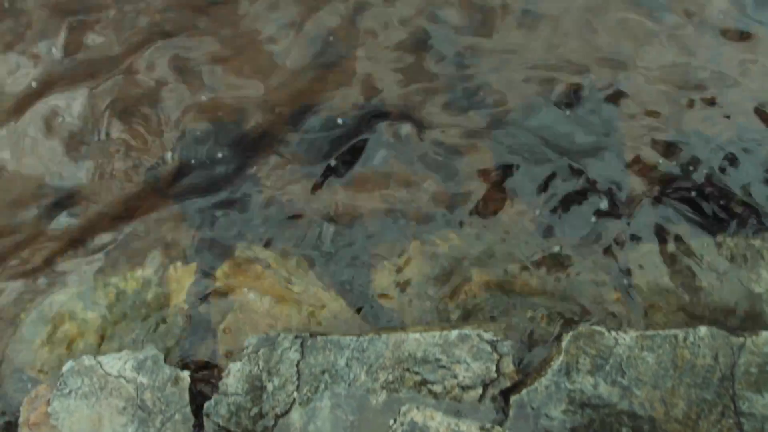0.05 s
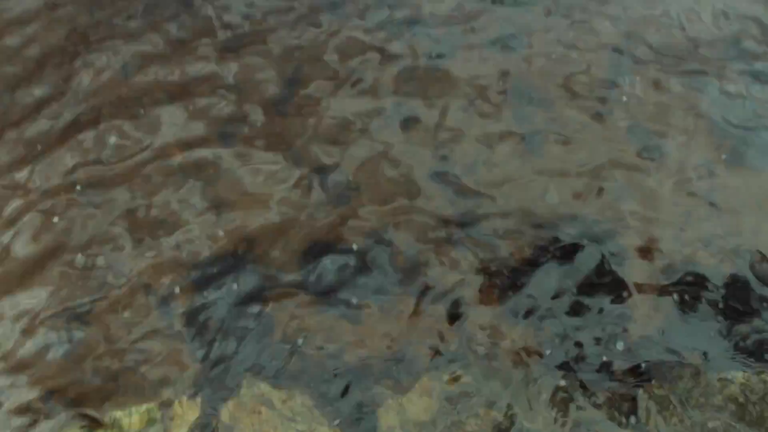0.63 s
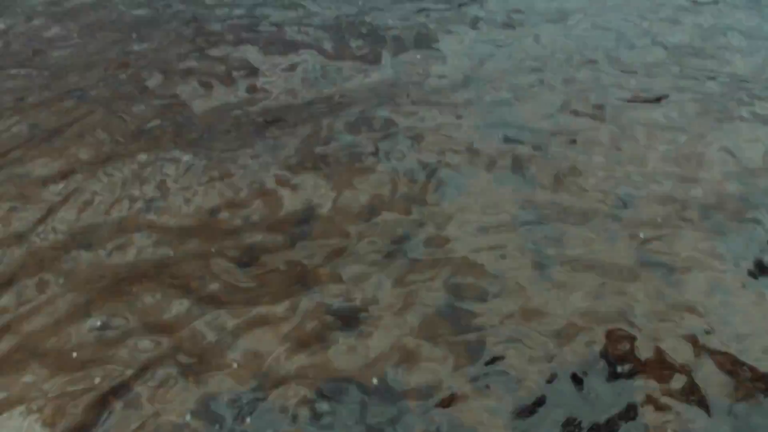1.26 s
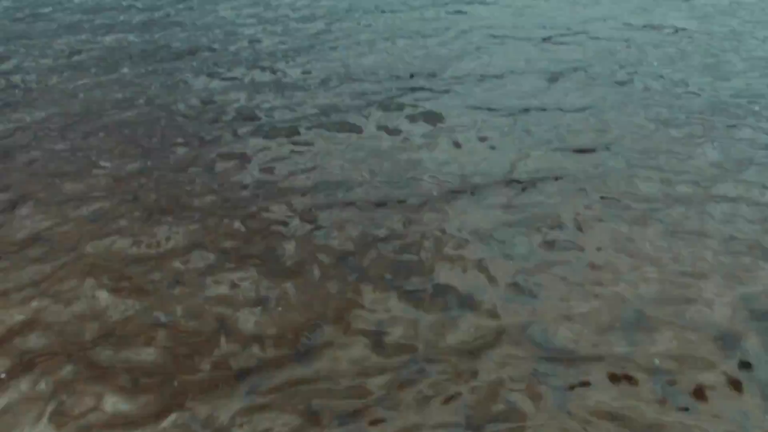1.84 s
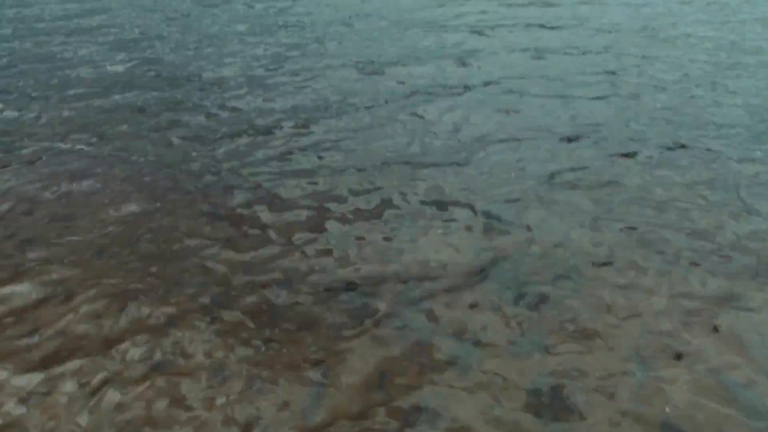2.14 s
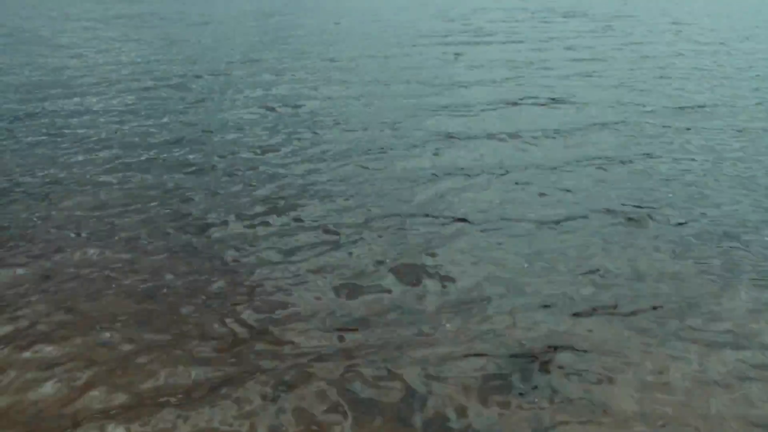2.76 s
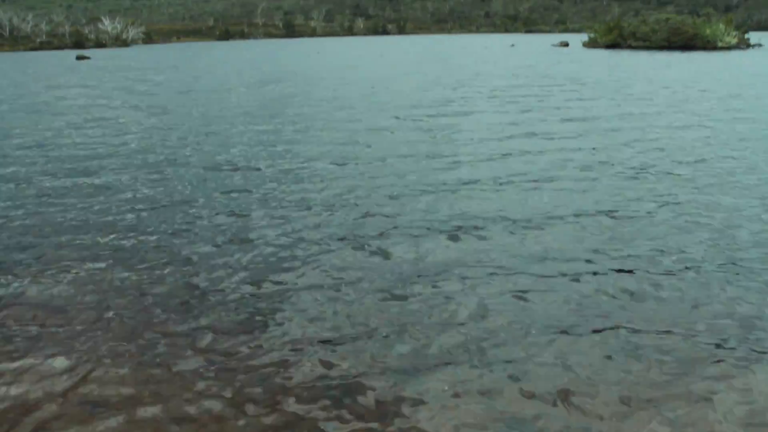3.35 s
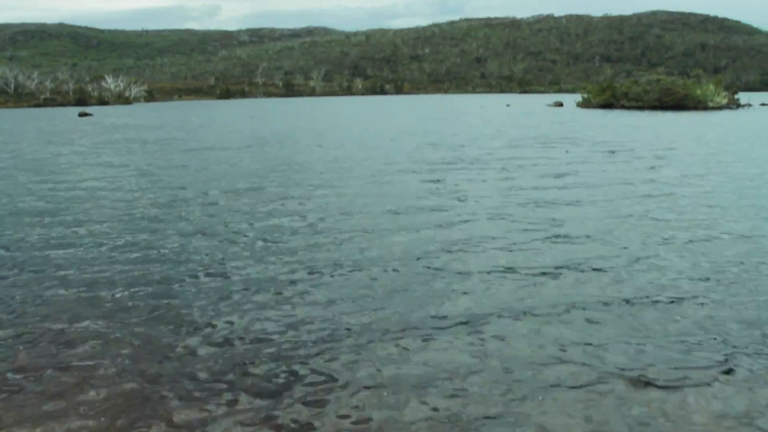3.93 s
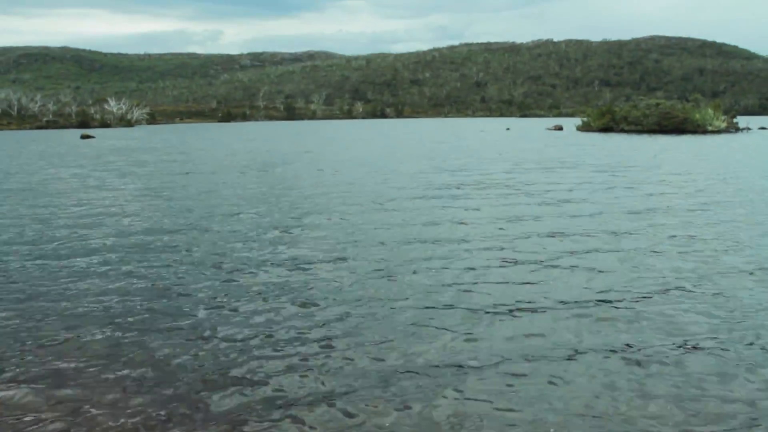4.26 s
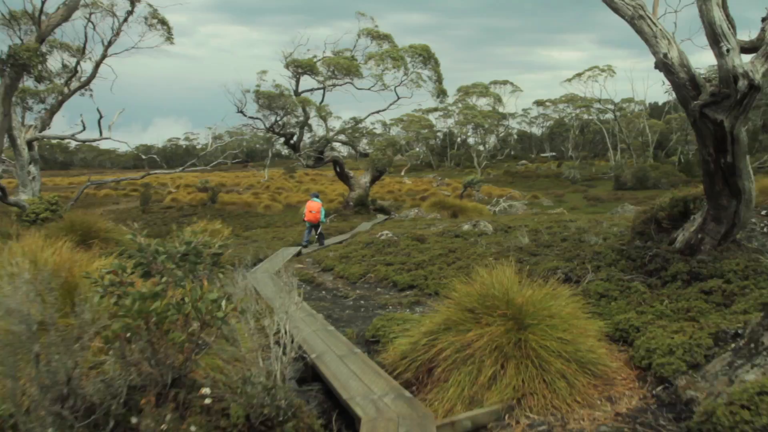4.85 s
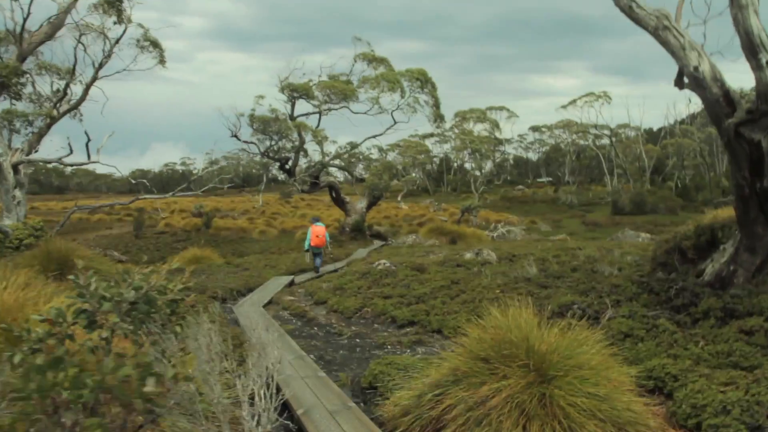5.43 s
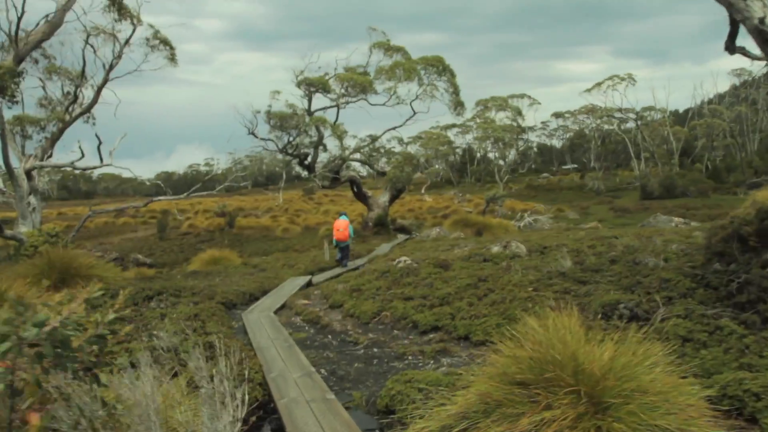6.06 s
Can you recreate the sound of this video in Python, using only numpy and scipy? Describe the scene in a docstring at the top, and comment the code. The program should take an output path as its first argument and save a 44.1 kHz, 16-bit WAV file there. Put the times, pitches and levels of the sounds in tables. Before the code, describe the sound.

Close by, gentle lake waves splash and plop on stones, with a light trickle between them. A faint high chorus, possibly frogs, hangs in the distance, and a small bird pipes briefly early on. The lapping continues in uneven bursts as the wind picks up. Toward the end the water stops, leaving gusts rumbling on the microphone and a breeze brushing through grass.

```python
"""Small waves lap against rocks on a lake shore: each traps air that plops and gurgles, and throws fine spray.
Water trickles between the stones. Behind it lie the wash of the open lake and a thin, far chorus, perhaps
frogs; a small bird pipes one short phrase. Wind builds and buffets the microphone, and near the end the trickle
and the chorus drop away quickly, leaving hissing, rustling grass."""
import sys
import numpy as np
from scipy import signal
from scipy.fft import rfft, irfft, next_fast_len
from scipy.io import wavfile
from scipy.ndimage import uniform_filter1d

SR = 44100
rng = np.random.default_rng(int(sys.argv[2]) if len(sys.argv) > 2 else 0)


def master_out(mix):
    """Clip the mix to full scale and print it as 16-bit PCM to the path in sys.argv[1]."""
    frames = np.transpose(np.atleast_2d(mix))
    ceiling = np.clip(frames, -1, 1)
    pcm = np.round(ceiling * 32767).astype(np.int16)
    wavfile.write(sys.argv[1], SR, pcm)


N = 268569
T = np.arange(N) / SR

# tone of each noise bed (f/Hz, relative level/dB)
LAKE_SPECTRUM = [(20, -28), (70, -9), (130, -2), (280, -0.5), (500, -1.5), (780, -9), (1000, -13),
                 (2000, -14.5), (3000, -22), (4200, -22.5), (7000, -24), (12000, -25.5), (16000, -28)]
CHORUS_SPECTRUM = [(1800, -20), (2400, -5), (2750, -4), (3080, -4.5), (3400, -22), (4000, -60)]
BUFFET_SPECTRUM = [(10, -9.5), (22, 1), (45, 0.5), (90, -6.5), (140, -14), (230, -18.5), (350, -46),
                   (700, -33.5), (2000, -61)]
GRASS_HISS_SPECTRUM = [(100, 5.5), (300, 2.5), (600, -10), (950, -8), (1800, -12.5), (3000, -15.5),
                       (7000, -20), (12500, -19), (16000, -35)]
BLADE_SPECTRUM = [(300, -2), (2000, 0), (3500, -6.5), (5500, 0.5), (8000, -5), (11000, 4.5), (13500, 2.5),
                  (16000, -10)]
# EQ on the droplet ticks (f/Hz, relative level/dB)
SPRAY_EQ = [(1500, 13.5), (3000, -3), (4800, -2.5), (7000, -2), (10000, 3.5), (13000, 6.5), (16000, -6)]
# gusts riding on the wind (t/s, added level/dB)
WIND_GUSTS = [(0.15, 6.5), (2.65, 9), (3.27, 3), (4.15, 3), (5.03, 4), (5.35, 3.5), (5.85, 3)]
# grass blades brushing together (t/s, half width/s, level/dB)
GRASS_RUSTLES = [(5.234, 0.072, -55.5), (5.708, 0.049, -45.5)]
# waves meeting the rocks (t/s, length/s, gurgle level/dB, spray level/dB)
WAVE_LAPS = [(0.013, 0.042, -49.5, -66), (0.126, 0.11, -80, -57.5), (0.252, 0.07, -51, -36.5),
             (0.306, 0.1, -52.5, -52.5), (0.424, 0.07, -52.5, -45.5), (0.733, 0.083, -60, -77),
             (0.907, 0.088, -57.5, -51.5), (1.028, 0.074, -58, -87), (1.179, 0.089, -63, -56.5),
             (2.004, 0.099, -52, -53), (2.423, 0.036, -65, -54), (2.57, 0.049, -69, -59),
             (2.714, 0.11, -58, -58.5), (3.1, 0.062, -69, -60.5), (3.292, 0.035, -54.5, -61),
             (3.475, 0.093, -47, -48.5), (3.58, 0.11, -55, -47.5), (3.816, 0.13, -68, -55.5),
             (4.274, 0.037, -49, -44.5), (4.333, 0.16, -44.5, -48), (4.449, 0.23, -49.5, -57.5)]
# sharp spits of spray (t/s, relative level/dB)
SPRAY_SPITS = [(0.264, -21), (0.272, -29), (0.283, -20.5), (0.451, -27), (0.459, -24), (0.728, -24),
               (1.235, -35), (1.295, -32.5), (1.996, -33), (2.015, -23), (2.027, -17.5), (2.429, -35),
               (2.447, -28), (2.736, -24.5), (2.904, -34), (3.493, -26.5), (3.59, -25), (4.442, -27.5)]
# the loudest air pockets closing (t/s, peak level/dB, f/Hz, cycles up to the peak)
AIR_POCKETS = [(0.033, -31, 1790, 2.6), (0.281, -27, 1740, 1.36), (0.2925, -11.5, 3040, 2.3),
               (0.2933, -8.5, 4670, 0.92), (0.337, -23.5, 1600, 1.4), (0.496, -28.5, 5540, 1),
               (0.787, -31, 5900, 2.9), (0.93, -39, 1600, 6.4), (0.967, -41, 1900, 11),
               (1.085, -38.5, 1290, 1.34), (1.294, -28, 3660, 0.6), (1.337, -34.5, 1800, 0.95),
               (1.997, -30.5, 2630, 0.6), (2.027, -31.5, 940, 1.13), (2.03, -25, 2800, 0.76),
               (2.126, -31, 2820, 0.73), (2.708, -32, 3270, 0.51), (2.736, -22.5, 3320, 0.56),
               (2.854, -31.5, 2060, 1.65), (3.172, -29.5, 770, 0.35), (3.51, -24.5, 1860, 1.2),
               (3.58, -24.5, 2040, 2.2), (3.591, -10, 2070, 0.43), (3.627, -21.5, 1610, 0.45),
               (3.665, -21.5, 1950, 0.63), (3.719, -26, 3240, 0.41), (3.786, -31, 1890, 0.74),
               (3.823, -28, 490, 0.21), (3.915, -30.5, 5000, 1.9), (3.97, -30, 4660, 5.5),
               (4.388, -27, 612, 0.5), (4.41, -17, 574, 0.3), (4.972, -29, 315, 0.8)]


def undb(db):
    """Decibels to gain."""
    return 10 ** (np.asarray(db) / 20)


def unit(x):
    """Scale to rms 1."""
    return x / np.sqrt(np.mean(x ** 2) + 1e-20)


def colour(x, points):
    """EQ with a curve of (f/Hz, level/dB) points."""
    hz, db = np.transpose(points)
    f = np.maximum(np.arange(len(x) // 2 + 1) * SR / len(x), 1)
    return irfft(rfft(x) * undb(np.interp(np.log(f), np.log(hz), db)), len(x))


def noise(points):
    """Noise of a given spectrum, rms 1."""
    return unit(colour(rng.standard_normal(next_fast_len(N)), points)[:N])


def wander(rate_hz):
    """Smooth random modulation, rms 1."""
    k = max(int(SR / rate_hz), 1)
    steps = np.repeat(rng.standard_normal(N // k + 1), k)
    return unit(uniform_filter1d(steps, k)[:N])


def band(x, hz, octaves):
    """Band-pass around a centre."""
    edges = [hz / 2 ** (octaves / 2), min(hz * 2 ** (octaves / 2), SR / 2 - 1)]
    return signal.sosfilt(signal.butter(2, edges, "band", fs=SR, output="sos"), x)


def add(out, s, x):
    """Mix a short sound in at time s."""
    i = min(max(int(s * SR), 0), len(out))
    out[i:i + len(x)] += x[:len(out) - i]


def hump(t, peak):
    """Envelope that swells to 1 at t = peak, then dies away."""
    return t / peak * np.exp(1 - t / peak)


def bell(s, half_s):
    """A smooth rise to 1 and fall around time s."""
    return np.exp(-((T - s) / half_s) ** 2)


def shore_fade(start_s=5.14, db_per_s=61):
    """Closing fade on the chorus and the trickle."""
    return undb(-db_per_s * np.maximum(T - start_s, 0))


def lake_wash(level_db=-55.5):
    """Open water: a low, rippling bed of noise."""
    ripple = undb(.5 * wander(3) + .9 * wander(22))
    return undb(level_db) * ripple * noise(LAKE_SPECTRUM)


def far_chorus(level_db=-63, swell_db=6.5):
    """Distant calls, perhaps frogs, blur into a thin, throbbing band that swells once."""
    throb = undb(2 * wander(45))
    level = shore_fade() * undb(level_db + swell_db * bell(0.67, half_s=0.12))
    return level * noise(CHORUS_SPECTRUM) * throb


def far_bird(run_s=1.586, step_s=0.0595, pip_hz=3140, pip_db=-48.5, taper_db=3):
    """A falling slur, then five rising pips, loudest in the middle, fluttering with distance."""
    notes = [(1.402, 2640, -47.5, -9000)]  # the slur (t/s, f/Hz, level/dB, glide/(Hz/s))
    notes += [(run_s + k * step_s, pip_hz, pip_db - taper_db * (k - 2) ** 2, 4700) for k in range(5)]
    out = np.zeros(N)
    t = T[:SR // 10] - 1 / 20
    swell = np.exp(-(t / .012) ** 2)
    for s, hz, db, glide in notes:
        whistle = np.sin(2 * np.pi * (hz + glide * t / 2) * t)
        add(out, s + t[0], undb(db) * swell * whistle)
    flutter = undb(4 * wander(220) - 2)
    return out * flutter


def wind_force(calm_db=-65.5, freshen_s=2.264, db_per_s=8.5):
    """Wind envelope: calm at first, then a steady build, with gusts on top."""
    gusts_db = sum(db * bell(s, half_s=0.099) for s, db in WIND_GUSTS)
    return undb(calm_db + db_per_s * np.maximum(T - freshen_s, 0) + gusts_db)


def wind_buffet(force, trim_db=1):
    """Eddies buffet the microphone with an uneven rumble."""
    eddies = undb(2.3 * wander(14))
    return undb(trim_db) * force * eddies * noise(BUFFET_SPECTRUM)


def grass(force, hiss_db=-24.5, wind_power=0.64):
    """The breeze hisses in the grass, building more gently than the rumble; blades brush together."""
    hiss = undb(hiss_db) * force ** wind_power * noise(GRASS_HISS_SPECTRUM) * undb(.5 * wander(5))
    brush = sum(undb(db) * bell(s, half_s) for s, half_s, db in GRASS_RUSTLES)
    rustle = brush * noise(BLADE_SPECTRUM) * undb(2 * wander(150))
    return hiss + rustle


def rock_echo(x, echo_db=-14, attack_s=0.0019, decay_s=0.0061):
    """Nearby stones scatter a short, dull tail behind the direct sound."""
    t = T[:SR // 8]
    tail = band(rng.standard_normal(len(t)), hz=3400, octaves=3.65)
    tail *= np.exp(-t / decay_s) * (1 - np.exp(-t / attack_s))
    tail /= np.sqrt(np.sum(tail ** 2))
    return x + undb(echo_db) * signal.fftconvolve(x, tail)[:N]


def bubble(hz, cycles, rise_per_cycle=0.0135):
    """An air pocket swells for about `cycles` and rings out, gliding up as it nears the surface."""
    swell_samples = cycles * SR / hz
    age = np.arange(int(7 * swell_samples) + 2) / swell_samples
    pitch = np.minimum(hz * (1 + rise_per_cycle * cycles * (age - 1)), SR / 2)
    return hump(age, peak=0.92) * np.sin(2 * np.pi * np.cumsum(pitch) / SR)


def swarm(length_s, hz, octaves, cycles, spread_db, count):
    """Bubbles scattered up to `octaves` either side of hz, most faint and a few strong; rms 1."""
    out = np.zeros(int(length_s * SR))
    for when, size, strength, ring in rng.random((count, 4)):
        pitch = hz * 2 ** (octaves * (2 * size - 1))
        db = -spread_db * np.log(strength + .005)
        add(out, when * length_s, undb(db) * bubble(pitch, cycles * (.5 + ring)))
    return unit(out)


def droplet_fizz():
    """Tiny droplets land in flurries, each a tick with its own high pitch; rms 1."""
    ticks = swarm(N / SR, hz=6500, octaves=1.25, cycles=1.2, spread_db=3.9, count=9000)
    flurries = undb(2 * wander(70))
    return unit(colour(np.resize(ticks, N), SPRAY_EQ) * flurries)


def trickle(droplets, flow_db=-55, lull_db=-7.5, patter_db=-4, fizz_db=-5):
    """Water drains between the stones: a faint, dense patter and a soft fizz, with one lull."""
    patter = swarm(N / SR, hz=1800, octaves=1.3, cycles=1.6, spread_db=3.8, count=2400)
    flow = shore_fade() * undb(flow_db + lull_db * bell(2.27, half_s=0.34))
    return flow * (undb(patter_db) * np.resize(patter, N) + undb(fizz_db) * droplets)


def spits(sizzle_db=-15, trim_db=-6):
    """A film of water sizzles as it stretches and snaps with a bright crack."""
    out = np.zeros(N)
    t = T[:SR // 25] - 1 / 50
    crack = np.exp(-(t / .0006) ** 2)
    sizzle = undb(sizzle_db) * np.exp(-np.abs(t - .001) / .003)
    for s, db in SPRAY_SPITS:
        hiss = unit(band(rng.standard_normal(len(t)), hz=10470, octaves=0.83))
        add(out, s + t[0], undb(db + trim_db) * (crack + sizzle) * hiss)
    return out


def laps(droplets, wash_db=-11, typical_hz=1409, typical_s=0.0855):
    """Each wave churns up a gurgle of bubbles, a soft wash and a fizz of droplets."""
    out = np.zeros(N)
    churn = rng.standard_normal(N)
    for s, length_s, gurgle_db, spray_db in WAVE_LAPS:
        hz = typical_hz * (typical_s / length_s) ** 0.185  # longer waves trap larger, lower bubbles
        gurgle = swarm(length_s, 1.3 * hz, octaves=1.35, cycles=2.0, spread_db=3, count=70)
        span = slice(int(s * SR), int(s * SR) + len(gurgle))
        wash = band(churn[span], hz, octaves=4.5)
        swell = np.sqrt(np.hanning(len(gurgle)))  # the wave runs up the stone and falls back
        add(out, s, undb(gurgle_db) * unit(swell * gurgle))
        add(out, s, undb(gurgle_db + wash_db) * unit(swell * wash))
        add(out, s, undb(spray_db) * unit(swell * droplets[span]))
    return out


def backwash(count=4, linger_s=0.015, over_gurgle_db=5, hz=1814, cycles=4.4):
    """A few bubbles surface as each wave falls back; rows as in AIR_POCKETS."""
    rows = []
    for s, length_s, gurgle_db, _ in WAVE_LAPS:
        for when, size, ring in rng.random((count, 3)):
            surface_s = s + length_s / 2 + when * (length_s / 2 + linger_s)
            pitch = hz * 2 ** (size - .5)
            rows.append((surface_s, gurgle_db + over_gurgle_db, pitch, cycles * (.5 + ring)))
    return rows


def plops(slap_db=-24, slap_s=.002, hollow_db=-33, hollow_s=.009):
    """Larger pockets ring once; the more abrupt, the harder they slap the stone and wake its hollows."""
    out = np.zeros(N)
    t = T[:SR // 12]
    wobble = undb(3.5 * wander(300))
    for s, db, hz, cycles in list(AIR_POCKETS) + backwash():
        ring = bubble(hz, cycles)
        if cycles > 5:  # long-lived bubbles are jostled as they rise
            ring *= wobble[int(s * SR):][:len(ring)]
        add(out, s - cycles / hz, undb(db) * ring)
        slap = unit(band(rng.standard_normal(len(t)), np.sqrt(hz * 1800), octaves=2.35))
        hollow = unit(band(rng.standard_normal(len(t)), hz=410, octaves=0.8))
        impact = undb(slap_db) * slap * hump(t, slap_s) + undb(hollow_db) * hollow * hump(t, hollow_s)
        # the water meets the stone just before the pocket closes
        add(out, s - slap_s, undb(db) / np.sqrt(cycles) * impact)
    return out


def scene():
    """Mono mix: close water among the rocks, the distant layers and the wind."""
    droplets = droplet_fizz()
    water = rock_echo(laps(droplets) + plops() + spits() + trickle(droplets))
    distance = lake_wash() + far_chorus() + far_bird()
    force = wind_force()
    return (water + distance + wind_buffet(force) + grass(force))[None]


def record(dry, top_hz=16000):
    """A steep low-pass trims the top of the mix."""
    return signal.sosfilt(signal.ellip(8, .2, 70, top_hz, fs=SR, output="sos"), dry)


dry = scene()
out = record(dry)
master_out(out)
```